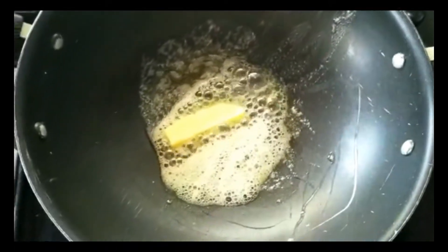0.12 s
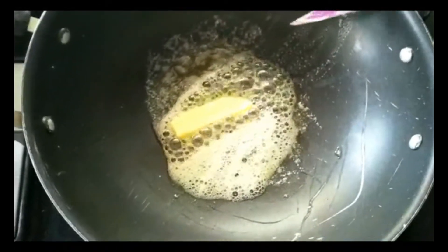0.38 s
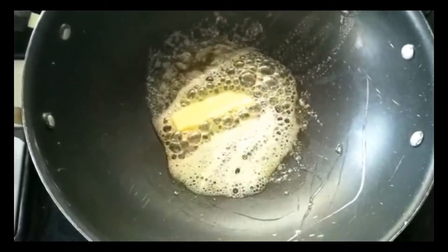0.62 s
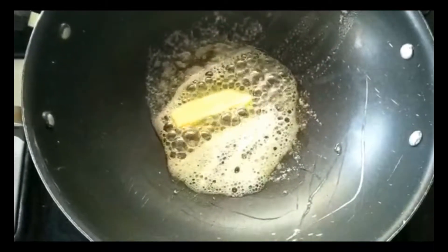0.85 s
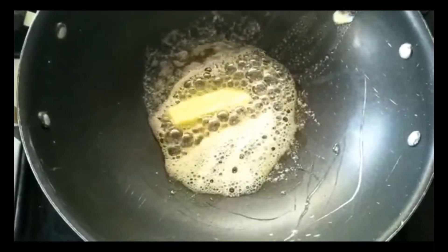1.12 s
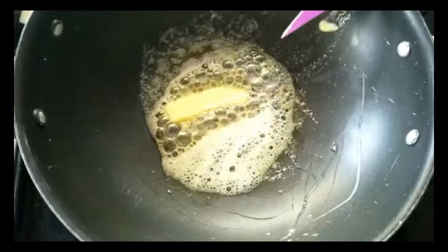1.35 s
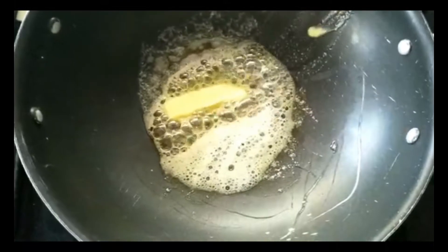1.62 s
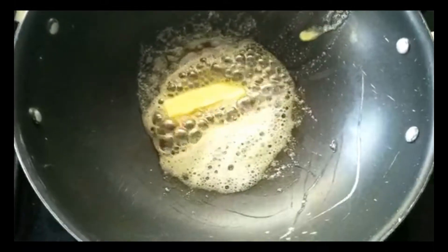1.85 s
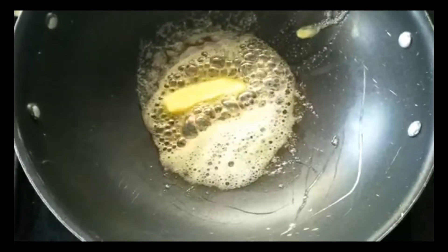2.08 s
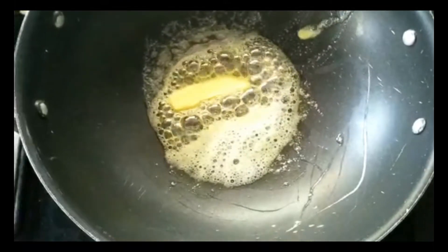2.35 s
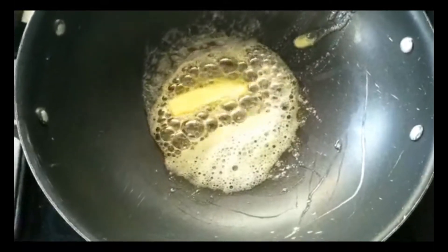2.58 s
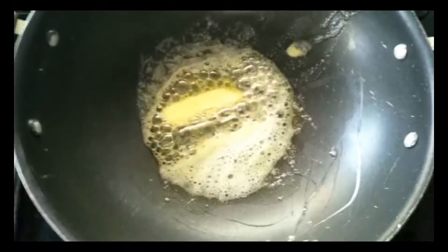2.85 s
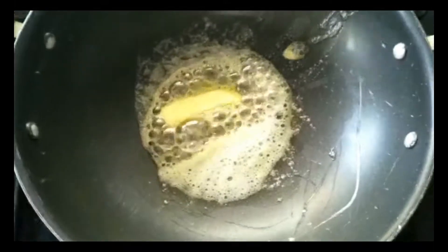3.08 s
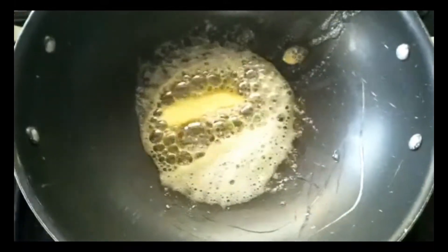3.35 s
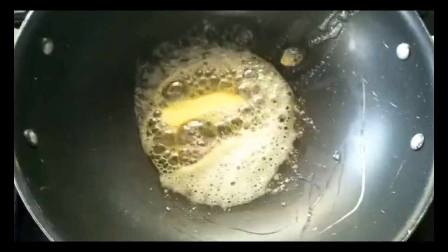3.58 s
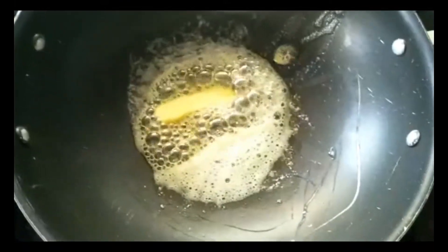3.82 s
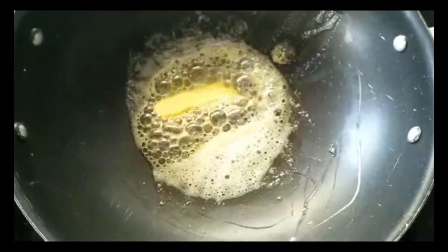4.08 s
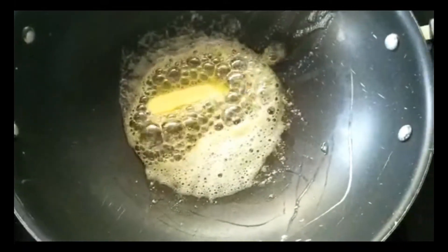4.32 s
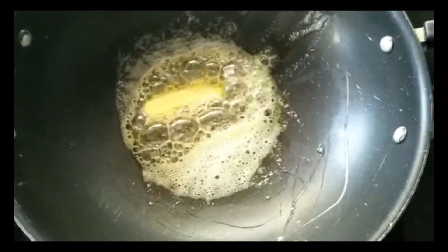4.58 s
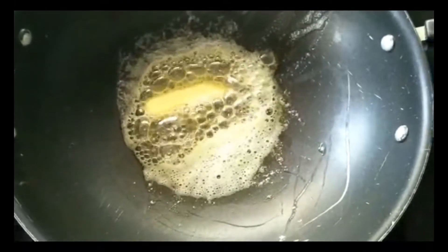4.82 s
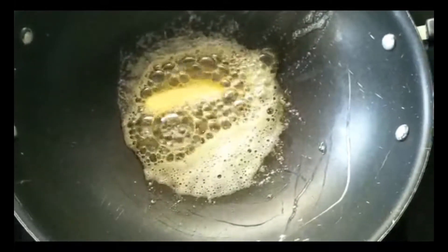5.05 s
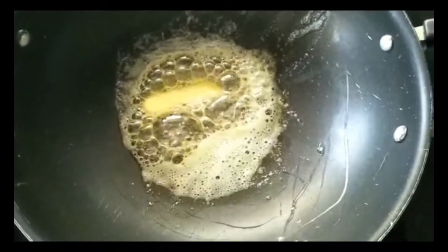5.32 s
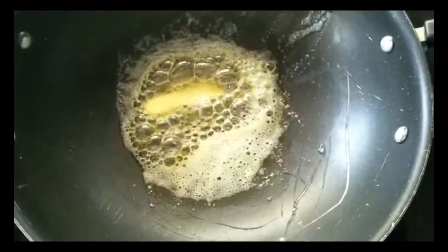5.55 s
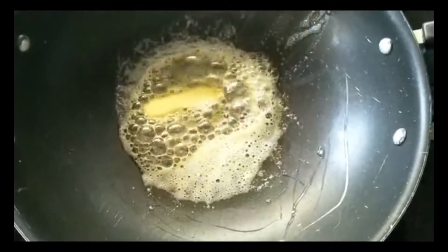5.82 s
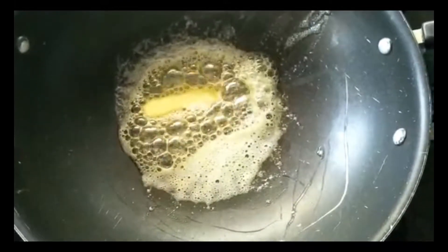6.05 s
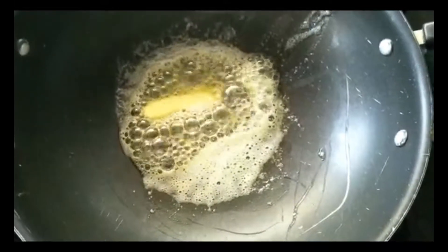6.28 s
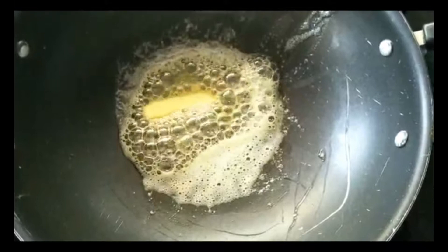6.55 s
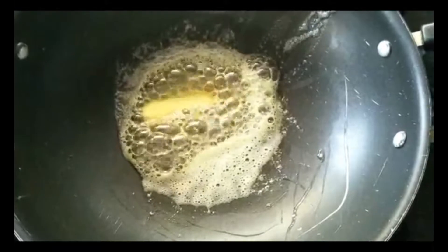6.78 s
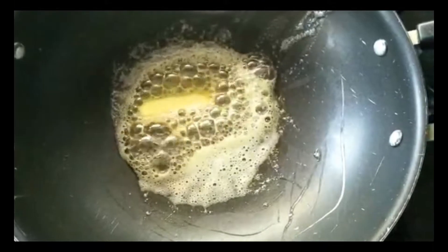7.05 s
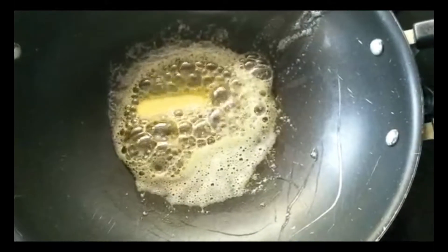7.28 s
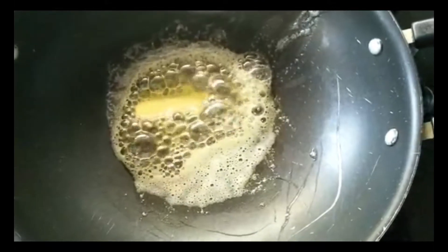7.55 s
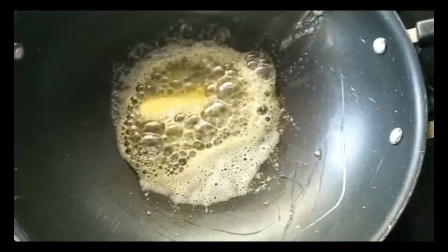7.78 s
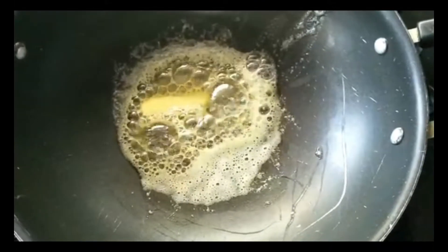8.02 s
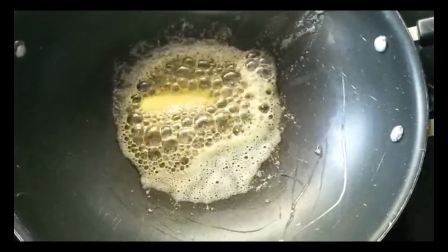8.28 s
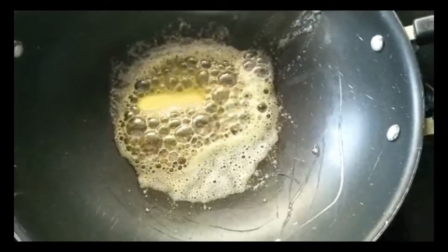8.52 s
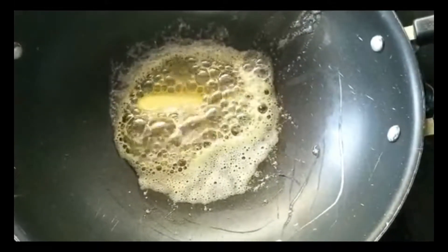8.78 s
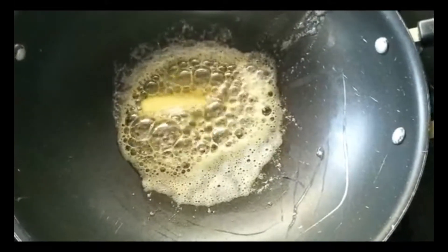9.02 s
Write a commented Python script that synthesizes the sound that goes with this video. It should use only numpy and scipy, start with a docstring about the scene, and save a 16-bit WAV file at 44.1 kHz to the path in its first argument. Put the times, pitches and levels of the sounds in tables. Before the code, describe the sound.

Butter melts in a hot steel pan, heard from close above: a steady bright hiss full of tiny crackles, with irregular sharp pops snapping many times a second. A faint knife tap comes almost at once, then one hard metallic click just after a second. The sizzle goes on, slightly stronger later. Dull knocks sound faintly across the kitchen around six seconds, over a low fan hum.

```python
"""Butter melts in a hot steel pan: its water boils off in countless small bubbles that burst with a snap and
a short ring and echo off the bowl of the pan; the finest foam merges into flickering hiss.
A knife taps the pan wall and strikes its modes; farther off in the kitchen something is knocked, heard as
dying noise in furniture modes. Near the end a short blip glides up; a fan hums low in the room air.
Two spaced microphones hang close above the pan."""
import sys
import numpy as np
from scipy import signal
from scipy.fft import rfft, irfft, next_fast_len
from scipy.io import wavfile
from scipy.ndimage import uniform_filter1d

SR = 44100
rng = np.random.default_rng(int(sys.argv[2]) if len(sys.argv) > 2 else 0)


def dump_mix(stems):
    """Bounce the given channels to the path in sys.argv[1] as a 16-bit WAV at rate SR."""
    frames = np.atleast_2d(stems).T  # one column per channel
    limited = np.clip(frames, -1, 1)  # hard clip at full scale
    pcm = np.round(limited * 32767).astype(np.int16)
    wavfile.write(sys.argv[1], SR, pcm)


def gain_from_decibels(decibels):
    """Convert decibel values to linear amplitude factors."""
    exponent = np.asarray(decibels, float) / 20
    return 10 ** exponent


N = 403074   # length in samples

# course of the boil between the large bursts: t/s, sizzle level/dB, treble level/dB, low-edge level/dB
BOIL_COURSE = [(0.0, -53.5, -59.5, -51.5), (0.76, -56, -60.5, -55.5), (1.14, -53.5, -60.5, -52.5),
               (1.55, -54.5, -65, -55), (1.96, -54.5, -59, -54), (2.62, -52.5, -64.5, -55),
               (3.44, -54.5, -63.5, -54), (3.82, -54, -65, -56), (4.27, -53, -64.5, -55),
               (6.11, -52.5, -64, -55.5), (6.49, -50.5, -65, -53), (7.18, -50, -64.5, -52.5),
               (7.48, -47, -67, -58.5), (7.94, -51.5, -63.5, -55.5), (8.94, -52, -65, -54),
               (9.14, -48, -64.5, -53)]
SURGE_DB, SURGE_CORNER_HZ = 0.6, 10   # chance surges of the sizzle: spread, corner of their low-pass
# loudest bubbles bursting: t/s, ring level/dB, ring f/Hz, ring length/cycles, snap level above 9 kHz/dB,
# left over right/dB
LARGE_BURSTS = [(0.0352, -34.5, 3830.0, 0.52, -55.0, 6), (0.0488, -31, 4740, 0.83, -40, 1),
                (0.1668, -35, 5160.0, 1.9, -58, 5.0), (0.3087, -28, 4600, 1, -36.0, 10),
                (0.3367, -23, 5960, 1.6, -36, 1), (0.41, -22.5, 4130, 0.75, -27.0, 5.5),
                (0.4973, -44, 3540.0, 0.8, -34, 3.0), (0.5561, -42, 5510.0, 1.8, -31, 1.0),
                (0.5692, -32, 5930.0, 5.0, -40.0, 3.0), (0.6384, -31.0, 5350, 1.9, -54.0, 8),
                (0.6924, -32.5, 3760, 0.9, -37, 8), (0.755, -39.5, 3590.0, 0.58, -42, 6.0),
                (0.8405, -38, 5100, 2.1, -30.5, 4), (0.9156, -26.5, 5600, 1.6, -41, 11),
                (0.9449, -24.5, 5870, 1.1, -59.0, 8), (0.9938, -34, 6310.0, 1.8, -50.0, 14),
                (1.0936, -35, 5010.0, 1.5, -53.0, 16.0), (1.1398, -28.5, 5800, 1, -50.0, 9.0),
                (1.1834, -27.0, 4900, 1.1, -52, 6.0), (1.2311, -39, 5170.0, 1.4, -35, 3.0),
                (1.2577, -26.5, 6140.0, 0.98, -37, 6), (1.2736, -38, 5410.0, 1.2, -39, 3),
                (1.6007, -33, 4300, 2, -62.0, 9), (1.6761, -29, 5650, 1.5, -29.5, 1),
                (1.6887, -27.0, 5600, 0.83, -45, -1), (1.772, -19.5, 6360, 1.9, -39, 12.5),
                (1.8017, -33, 6100, 1.1, -32, 2), (1.8442, -37, 5170, 2, -39, 14),
                (1.8708, -47, 3750.0, 2.2, -35.0, -16), (1.9215, -32.5, 5800, 3.2, -48, 12.0),
                (1.9281, -33, 5550.0, 1.7, -59.0, -7), (2.0054, -24.0, 4560.0, 0.83, -42, 1),
                (2.0642, -43, 6400.0, 3.6, -32, 3), (2.1075, -43.0, 4570.0, 1.2, -32.5, 9),
                (2.1675, -22, 5660, 1.8, -50, 7), (2.2598, -28, 5600, 0.94, -60.0, 6),
                (2.2823, -32, 4590.0, 0.85, -31.5, 6), (2.4697, -33, 5860, 0.81, -59.0, 11),
                (2.4918, -32, 5960, 0.99, -41, 10), (2.5236, -29.5, 6060, 1.7, -56.0, 13),
                (2.5363, -42, 5190.0, 1.3, -42.0, 8), (2.7573, -52, 4350.0, 2.2, -64.0, 6),
                (2.8048, -36, 4120, 3.4, -60.0, 3), (2.8348, -52.0, 4350.0, 4.9, -49, 2),
                (2.947, -32, 6090.0, 0.83, -53, 12.0), (2.9944, -48, 4590.0, 1.3, -43, 4),
                (3.1386, -36, 4620.0, 1.9, -62.0, 6), (3.199, -34, 5770, 1.3, -30, 2),
                (3.2598, -45, 4720.0, 1.2, -29.5, 2), (3.3351, -33, 4370.0, 1.7, -60.0, 5.0),
                (3.3815, -27.5, 4430, 1.3, -51, 3.0), (3.5367, -27.5, 5850, 1.2, -50, -7),
                (3.8015, -32, 5360, 4, -62.0, 9), (3.8113, -25.5, 5230, 1.4, -62.0, 2),
                (3.8635, -27.5, 5030.0, 1.9, -62.0, 0), (3.91, -30, 5380.0, 2.2, -63.0, 1),
                (3.9892, -31.5, 5560, 1.6, -63.0, -11), (4.0742, -36, 4750, 1.1, -62.0, 0),
                (4.1039, -29.5, 5240.0, 1.2, -61.0, -3), (4.2077, -37.5, 4470.0, 2.3, -54.0, 13.0),
                (4.2199, -30, 4790.0, 2.5, -62.0, 4.0), (4.2762, -29, 6120.0, 1.4, -62.0, 7),
                (4.292, -35, 5440.0, 2.4, -60, 9.0), (4.402, -32.0, 5770.0, 2, -38, 3),
                (4.448, -37, 4870.0, 0.91, -39, 4), (4.4897, -55, 4450.0, 1.4, -40.0, -2),
                (4.4987, -60, 4190.0, 5.0, -40.0, 1), (4.5628, -33, 4800, 0.98, -43, 1.0),
                (4.571, -46, 4260.0, 2.7, -46, 3), (4.6083, -23, 6700, 2.4, -54, 5),
                (4.7467, -28, 6400, 3.6, -60.0, 4.0), (4.7621, -32, 4400.0, 5.0, -60.0, 2),
                (4.7793, -49.0, 4530.0, 3.4, -35, 2), (4.8107, -27.0, 5630, 3.1, -60.0, 0),
                (4.8196, -31, 5400, 1.7, -48.0, 1), (4.8273, -22, 6600, 3.2, -44.0, 6),
                (4.8545, -26.5, 6000, 1.5, -51.0, 12.0), (4.8933, -32, 6040, 2.0, -53, -5),
                (4.9695, -21.5, 5950, 1.14, -41.0, 4), (4.9917, -31, 5210.0, 0.83, -59.0, -1),
                (5.0263, -46, 6420.0, 1, -34, 1.0), (5.1442, -41, 6950.0, 2, -31.5, 4),
                (5.1687, -26, 5700, 1.3, -60.0, 2), (5.1953, -30, 5040, 1.6, -61.0, 1),
                (5.2263, -21, 4270, 1.7, -58.0, 4), (5.2912, -30.5, 3600, 2.5, -52.0, 2),
                (5.4075, -26.5, 5050, 2, -58.0, 7), (5.4602, -29.5, 5310.0, 1.2, -60, 8),
                (5.4834, -34, 5420.0, 1.3, -57, 5.0), (5.528, -29, 6000, 1.2, -64.0, 9),
                (5.6789, -16.5, 5650, 1.17, -49, 2), (5.6864, -34, 5100.0, 4.1, -60.0, -3.0),
                (5.7095, -23.5, 5600, 1.5, -58, 10), (5.7855, -45, 6090.0, 5.0, -31, 4),
                (5.8265, -35, 6260.0, 5.0, -60.0, 3.0), (5.8875, -32.5, 5540.0, 3.9, -62.0, -4),
                (6.0368, -27.5, 5500, 2, -53, 0), (6.1211, -29.5, 5500, 1.3, -62.0, -5),
                (6.1484, -25.5, 5830, 2, -60.0, 6), (6.1765, -30.0, 5740.0, 2.2, -37, 1.0),
                (6.1824, -23, 5800, 0.95, -61.0, 2.0), (6.1885, -23, 5240, 2.1, -51.0, 3),
                (6.2533, -38.0, 5380.0, 2.7, -36, 2), (6.2927, -32.5, 3400, 2.2, -62.0, 2),
                (6.3424, -30, 6430.0, 1.9, -51.0, 8), (6.4101, -29, 7050.0, 1.4, -39, 5),
                (6.4304, -26.0, 4450, 2.2, -56.0, 8), (6.4549, -46, 5070.0, 1, -39, 6.0),
                (6.4855, -39, 3920.0, 0.8, -40, 6), (6.5872, -30, 5430, 1.1, -62, 4),
                (6.6078, -34, 5330.0, 3.6, -30.5, 6), (6.6363, -24.5, 5300, 1.7, -62.0, -1),
                (6.6911, -21.5, 4640.0, 1.5, -63.0, 9.5), (6.7002, -31, 4000, 1.8, -59, -16),
                (6.7121, -46, 4530, 3.2, -38, 5), (6.8197, -51, 4790.0, 3.4, -42.0, 12),
                (6.8564, -23.5, 5300, 3.7, -58, 0), (6.8841, -29.0, 5980.0, 2, -35, 5),
                (7.0637, -51, 5640.0, 3.1, -32, 2), (7.1241, -30, 5730.0, 3, -62.0, 11),
                (7.1843, -33, 7540, 3.1, -37, 7), (7.2533, -32, 4970, 2.3, -35, 7),
                (7.3511, -33.5, 5150.0, 2.7, -62.0, 12), (7.3604, -29, 5550.0, 2.4, -65, 11),
                (7.4174, -31, 5530, 3.8, -62.0, 8), (7.5638, -29, 6060, 2, -48, 15),
                (7.6205, -52, 5410.0, 0.8, -45, 4), (7.68, -24, 4870, 1.1, -64.0, 2),
                (7.7984, -27, 6140.0, 2.8, -62.0, 3.0), (7.8104, -23.5, 5700, 1.1, -44, 13),
                (7.941, -30.5, 5270, 4.7, -62.0, 3), (7.9677, -56, 4480.0, 1.7, -36, 4),
                (7.9936, -33, 5800, 1.7, -35, 6), (8.1093, -32, 4400, 2.1, -60, 9),
                (8.1461, -33, 7350, 4.0, -62.0, 8.0), (8.2797, -23, 5500.0, 1.3, -62.0, -2),
                (8.3278, -26, 4840, 1.6, -42, 5), (8.3981, -25.5, 5400, 1.2, -62.0, 3),
                (8.5382, -30, 6400.0, 5.4, -61.0, 0.0), (8.5693, -24.5, 5700, 1.9, -57, 11),
                (8.5772, -31.0, 4370, 1.9, -63.0, 5.0), (8.5946, -34, 4850, 4.1, -62, 9.0),
                (8.6573, -23, 5400.0, 1.5, -53.0, 4), (8.6633, -31, 5260.0, 2.7, -61.0, 7),
                (8.6723, -56, 5030, 1.1, -37, -5), (8.7261, -31, 5910.0, 1.8, -62.0, 9),
                (8.7423, -27, 5340, 1.1, -63.0, -1), (8.8459, -22, 5600, 0.98, -43, 5),
                (9.0255, -24, 4630.0, 1.2, -52.0, 0), (9.0573, -29, 4230, 3.2, -62.0, 0)]
# chance of the middling bursts, rows (mean, spread): ring level over the sizzle/dB, ring f/Hz,
# ring length/cycles, snap level over the treble of the sizzle/dB, left over right/dB
MIDDLING_CHANCE = [(11, 6.3), (5400, 820), (2.24, 1.4), (12, 4.9), (5.1, 12)]
# colour of the sizzle as pan and microphones pass it: f/Hz, gain/dB
SIZZLE_COLOUR = [(820, -53), (1400, -40), (1650, -21.5), (2240, -12.5), (2640, 1.5), (3220, 2), (5470, 4.5),
                 (6010, 4), (6810, 4), (9500, -10), (12300, -12), (15200, -4.5), (16000, -56), (16800, -58)]
POP_ECHO_DB, POP_ECHO_SPREAD_DB = -8.5, 1.5   # echoes of a one-cycle burst against its ring
ECHO_SIDE_SHARE = 0.42   # share of a burst's left-right difference in dB that its echoes keep
POP_BODY_DB, BODY_PITCH_SHARE = -17.5, 0.57   # a burst also gives one dull cycle at this share of its pitch
BOWL_HZ, BOWL_WIDTH_HZ, BOWL_DB = 2740, 200, 5.5   # the air in the pan's bowl rings after a burst
LEAD = 120   # samples that a ring may swell before its peak

# knife on the pan wall: t/s, level/dB, centre f/Hz, fall-off/(dB/octave), crack level/dB,
# share of the full ring time
KNIFE_TAPS = [(0.4101, -27, 2700, 45, -50, 0.72), (0.4364, -29, 6600, 16, -45, .08),
              (0.4421, -22.5, 1260, 8, -47, 0.46), (0.4439, -28.5, 6600, 24, -33, 1.14),
              (1.3565, -21, 1000, 5.5, -45, 0.9), (1.357, -23.5, 5460, 9, -20, 1.1),
              (1.3587, -14, 6900, 9, -23, 0.35), (1.36, -27, 5050, 1.5, -29, 0.91),
              (1.3717, -27, 7000, 12, -35, 1.2), (1.3814, -15.5, 4600, 18, -38, 0.29),
              (.458, -19.5, 100, 19, -70, 1), (1.376, -13, 99, 22, -70, 0.46)]
# modes of the pan: f/Hz, relative level/dB, full t60/s
PAN_MODES = [(86, -20.5, 0.25), (194, -22, 1.0), (483, -23, 0.66), (565, -19, 0.099), (660, -15, 0.066),
             (745, -13, 0.12), (750, -26, 0.69), (851, -36, 0.44), (1268, -12, 0.13), (1222, -36.5, 1.0),
             (1233, -40, 1.0), (1330, -32, 1.0), (1600, -24, .06), (1850, -15, 0.06), (1990, -14.5, 0.13),
             (2460, -29, 0.069), (2700, -12, 0.07), (2920, -4, 0.057), (4300, -12, 0.075),
             (4640, -5.5, 0.051), (5050, -1.5, 0.063), (5950, -2.5, 0.039), (6870, -3, 0.078),
             (7560, -3, 0.024)]
BEATING_FROM_HZ = 3700   # below this the pan modes lie apart and ring ever cleaner

# knocks across the room: t/s, level/dB, centre f/Hz, fall-off/(dB/octave), rise/s, full t60/s
FAR_KNOCKS = [(6.094, -42, 745, 37, 0.012, 0.47), (6.095, -51.5, 1260, 39, 0.012, 0.35),
              (6.386, -45, 930, 25, 0.0019, 0.3), (6.445, -54, 970, 28, 0.0028, 0.45),
              (6.469, -43.5, 550, 39, 0.008, 0.4), (6.47, -51.5, 1150, 16, 0.0066, 0.55)]
# modes of the knocked furniture: f/Hz, width of each filter pass/Hz, relative level/dB, share of the t60
FURNITURE_MODES = [(476, 54, 3.5, 1.5), (557, 45, -2, 1.1), (654, 30, 3, 0.25), (755, 35, -4.5, 1.14),
                   (860, 130, -3.5, 1.34), (1000, 71, -3.5, 1.14), (1086, 65, -6, 1.5),
                   (1306, 76, 0.5, 0.81), (1730, 1800, 14, 0.72)]
# low blip sweeping up: t/s, f/Hz, rms level/dB
RISING_BLIP = [(9.115, 117.6, -56), (9.124, 256, -58), (9.130, 560, -47), (9.134, 670, -40),
               (9.14, 887, -58)]

# colour of the room air: f/Hz, relative level/dB
AIR_COLOUR = [(15, -38), (25, -15.5), (69, -1.5), (115, -5), (147, -7.5), (182, -10), (267, -6),
              (393, -12.5), (674, -14), (1050, -12.5), (1640, -16), (2270, -14.5), (2500, -23),
              (3250, -0.5), (5500, -120)]
AIR_DB = -58.5   # rms level
# hum of the fan: f/Hz, width of each filter pass/Hz, rms level/dB
FAN_HUM = [(90.2, 18.5, -71), (132.65, 4.4, -68.5), (271.6, 25, -72.5)]
STEADINESS = 0.59   # narrow rings and hums waver less than noise does: 0 noise, 1 even level
KITCHEN_T60_S, KITCHEN_DB = 0.45, -14.5   # reverberation: decay time, level against the near sound

# likeness of diffuse sound in the two microphones: f/Hz, correlation
MICROPHONE_LIKENESS = [(60, 0.9995), (140, 0.999), (280, .985), (550, 0.85), (1100, .75), (2000, 0.5),
                       (4970, 0.3), (15000, 0.15)]
RIGHT_LAG_S, AIR_LAG_S = 0.00022, 0.00017   # right microphone behind the left: bursts, diffuse sound


def pops():
    """Each burst of some size rings at its pitch and side, and stirs the air in the bowl."""
    out = np.zeros((2, N + 2000))
    for s, peak_db, hz, cycles, treble_db, pan_db in sorted(LARGE_BURSTS) + middling_pops():
        # a single tick puts 14 kHz / SR of its height into the band above 9 kHz
        snap_db = treble_db - peak_db + 20 * np.log10(SR / 14000)
        echo_db = POP_ECHO_DB + POP_ECHO_SPREAD_DB * rng.standard_normal()
        echo_db -= 5.0 * np.log10(cycles)   # long rings overlap in their echoes
        shape = burst(hz, snap_db, echo_db, cycles, dying_s=0.01, body_db=POP_BODY_DB) * gain_from_decibels(peak_db)
        sided = np.where(np.arange(shape.shape[1]) < LEAD + 40, 1, ECHO_SIDE_SHARE)
        at = round(s * SR) - LEAD
        out[:, at:at + shape.shape[1]] += shape * gain_from_decibels(pan_db / 2 * sided * [[1], [-1]])
    bursts = out[:, :N]
    bowl = gain_from_decibels(BOWL_DB) * resonance(bursts, BOWL_HZ, BOWL_WIDTH_HZ)
    return signal.sosfilt(signal.butter(3, [500, 16000], "band", fs=SR, output="sos"), bursts + bowl)


def middling_pops():
    """Middling bubbles burst at random, 12 a second, with levels that follow the boil."""
    s, sizzle_db, treble_db, _ = np.transpose(BOIL_COURSE)
    mean, spread = np.transpose(MIDDLING_CHANCE)
    when = rng.uniform(0.01, N / SR, size=110)
    luck = np.clip(rng.standard_normal((len(when), 5)), -2, 2)
    over_db, hz, cycles, snap_db, pan_db = (mean + spread * luck).T
    peak_db = np.interp(when, s, sizzle_db) + over_db
    snap_db = np.interp(when, s, treble_db) + snap_db
    return list(zip(when, peak_db, hz, np.maximum(cycles, 0.8), snap_db, pan_db))


def burst(hz, snap_db, echo_db, cycles, dying_s, body_db):
    """One bubble snaps and rings a few cycles, then echoes off bowl and stove, other echoes each side."""
    luck = rng.random((2, 3, 60))
    direct_s = np.array([[0], [RIGHT_LAG_S]]) + 0.00004 * luck[:, 2, :1]
    lags = direct_s + np.arange(60) ** 1.3 * 0.00007 * (0.5 + luck[:, 0])
    lags[:, 1:] += 0.0008   # way to the nearest wall of the bowl and back
    heights = gain_from_decibels(echo_db) * np.exp(-lags / dying_s) * (2 * luck[:, 1] - 1)
    heights[:, 0] = 1   # the direct sound
    paths = np.zeros((2, 1600))
    np.add.at(paths, (np.arange(2)[:, None], np.minimum(lags * SR, 1599).astype(int)), heights)

    u = np.arange(-LEAD, 2 * LEAD) / SR * hz / cycles   # time in ring lengths
    envelope = np.exp(-np.where(u < 0, 2.5, 1.5) * u ** 2)   # swells fast and dies more slowly
    ring = np.sin(2 * np.pi * cycles * u + 1.26) * envelope
    v = u * cycles * BODY_PITCH_SHARE
    body = gain_from_decibels(body_db) * np.sin(2 * np.pi * v + 0.89) * np.exp(-2.0 * v ** 2)
    sound = signal.fftconvolve(paths, (ring + body)[None], axes=1)

    tick = gain_from_decibels(snap_db) * signal.lfilter([0.85, -0.2], [1], paths)   # the film tears: one bright tick
    weaker_echoes = 1.1 + 0.15 * np.exp(-np.arange(1600) / 30)
    sound[:, LEAD:LEAD + paths.shape[1]] += tick * weaker_echoes
    return sound


def crackle(sizzle_db, finest_db, coarsest_db):
    """Small bubbles burst in random clumps over nearly three octaves, each pitch at a spot of its own."""
    born = rng.random(N) < 3500 * gain_from_decibels(1.5 * drift(25)) / SR   # about 3500 a second
    sizes = gain_from_decibels(5.5 * np.minimum(rng.exponential(1, N), 3.0))
    sizes = born * sizes * rng.choice([-1, 1], N)
    pitches, dealt = np.geomspace(2200, 15000, 22), rng.integers(0, 22, N)
    size, total = next_fast_len(N + 2048), 0
    for k, hz in enumerate(pitches):
        fine = np.clip(np.log2(hz / 7000) * 2, 0, 1)
        gain = gain_from_decibels(sizzle_db + fine * finest_db + (hz < 3800) * coarsest_db + 2.0 * drift(25.0))
        shape = burst(hz, snap_db=-4.5, echo_db=6.0, cycles=2.14, dying_s=0.0037, body_db=-17.5)
        strikes = sizes * (dealt == k) * gain
        total = total + rfft(strikes, size) * rfft(rms_one(shape) * np.sqrt(hz), size)
    return irfft(total, size)[:, LEAD:N + LEAD] * gain_from_decibels(-64.0)


def foam(sizzle_db, finest_db, coarsest_db):
    """The finest foam merges into hiss that follows the boil; each size of bubble flickers on its own."""
    noise = stereo_noise()
    low, middle, high = [signal.sosfilt(signal.butter(3, edges, "band", fs=SR, output="sos"), noise)
                         for edges in ([2200, 3800], [3800, 8500], [8500, 18000])]
    low = low * gain_from_decibels(coarsest_db + 1.5 * drift(17))
    middle = middle * gain_from_decibels(1.5 * drift(21))
    high = high * gain_from_decibels(finest_db + 2.2 * drift(13))
    return gain_from_decibels(sizzle_db - 2.5) * (low + middle + high)


def taps():
    """Each touch of the knife is a rough crack that strikes all pan modes; phases differ per microphone."""
    out, t = np.zeros((2, N)), np.arange(SR // 2) / SR
    edge = signal.butter(3, [1700, 8200], "band", fs=SR, output="sos")
    swell = 1 - np.exp(-t / 0.00014)
    for s, peak_db, centre_hz, fall_db, crack_db, share in KNIFE_TAPS:
        phases, at = rng.normal(0, 1, (len(PAN_MODES), 2, 1)), round(s * SR)
        grit = rng.standard_normal((2, len(t)))
        crack = signal.sosfilt(edge, grit) + 0.079 * grit
        out[:, at:at + len(t)] += swell * gain_from_decibels(crack_db - 60 * t / (0.051 * share)) * crack
        for (hz, level_db, t60), phase in zip(PAN_MODES, phases):
            struck_db = peak_db + level_db - fall_db * abs(np.log2(hz / centre_hz))
            decay = gain_from_decibels(struck_db - 60 * t / (t60 * share))
            # close modes beat unevenly
            shiver = uniform_filter1d(rng.standard_normal((2, len(t))), size=200)
            beating = 0.61 + 7.8 * min(hz / BEATING_FROM_HZ, 1) ** 2 * shiver
            wave = np.sin(2 * np.pi * hz * t + phase * min(hz / 2500, 3))
            out[:, at:at + len(t)] += swell * decay * beating * wave
    return out


def knocks():
    """Far blows arrive as reverberation: dying noise in the modes nearest each blow's centre."""
    out, noise, t = 0, stereo_noise(), np.arange(N) / SR
    rung = [gain_from_decibels(db) * narrow_noise(noise, hz, width) for hz, width, db, _ in FURNITURE_MODES]
    for s, level_db, centre_hz, fall_db, rise, t60 in FAR_KNOCKS:
        since = np.maximum(t - s, 0)
        swell = 1 - np.exp(-since / rise)
        for mode, (hz, _, _, share) in zip(rung, FURNITURE_MODES):
            struck_db = level_db - fall_db * abs(np.log2(hz / centre_hz))
            out = out + mode * swell * gain_from_decibels(struck_db - 60 * since / (t60 * share))
    return out


def blip():
    """A short sine glides upward, its phase summed from the moving pitch."""
    s, hz, db = np.transpose(RISING_BLIP)
    t = np.arange(N) / SR
    phase = 2 * np.pi * np.cumsum(np.interp(t, s, hz)) / SR
    return np.sqrt(2) * gain_from_decibels(np.interp(t, s, db, left=-120)) * np.sin(phase)


def kitchen(x):
    """Diffuse tail of decaying noise, without the deep bass and darker than the direct sound."""
    t = np.arange(SR // 2) / SR
    tail = rng.standard_normal((2, len(t))) * gain_from_decibels(-60 * t / KITCHEN_T60_S) * (t > 0.006)
    tail = signal.sosfilt(signal.butter(1, [400, 4000], "band", fs=SR, output="sos"), tail)
    return signal.fftconvolve(x, tail / np.sqrt(np.sum(tail ** 2) / 2), axes=1)[:, :N]


def air():
    """Steady room noise, and the wavering hum of a fan as narrow bands of noise."""
    noise = stereo_noise()
    hum = sum(gain_from_decibels(db) * narrow_noise(noise, hz, width) for hz, width, db in FAN_HUM)
    return gain_from_decibels(AIR_DB) * rms_one(coloured(stereo_noise(), AIR_COLOUR)) + hum


def stereo_noise():
    """White noise, alike at both microphones in the bass, unrelated in the treble, a little late on the right."""
    mid, side = rfft(rng.standard_normal((2, N)))
    hz = np.arange(len(mid)) * SR / N
    alike = np.clip(at_hz(MICROPHONE_LIKENESS, hz), -1, 1)
    late = np.exp(-2j * np.pi * hz * hz / (hz + 150) * [[0], [AIR_LAG_S]])   # less late in the deep bass
    both = np.sqrt(1 + alike) * mid + np.sqrt(1 - alike) * side * [[1], [-1]]
    return irfft(late * both, N) / np.sqrt(2)


def narrow_noise(noise, hz, width):
    """Noise through two equal resonances, its slow swells partly evened out; rms 1."""
    x = resonance(resonance(noise, hz, width), hz, width)
    level = uniform_filter1d(np.mean(x, axis=0) ** 2, size=1500)
    return rms_one(x / (level + 0.029 * level.mean()) ** (STEADINESS / 2))


def resonance(x, hz, width):
    """Two-pole band-pass, gain 1 on top."""
    r = np.exp(-np.pi * width / SR)
    poles = [1, -2 * r * np.cos(2 * np.pi * hz / SR), r * r]
    return signal.lfilter([(1 - r * r) / 2, 0, (r * r - 1) / 2], poles, x)


def drift(rate):
    """Slow chance: noise through a double one-pole low-pass with its corners at rate/Hz; spread 1."""
    r = np.exp(-40 * np.pi * rate / SR)   # drawn at every 20th sample
    slow = signal.lfilter([1], [1, -2 * r, r * r], rng.standard_normal(N // 20 + 2002))[2000:]
    return np.interp(np.arange(N) / 20, np.arange(len(slow)), rms_one(slow))


def coloured(x, spectrum):
    """Filter by a table of f/Hz, gain/dB."""
    size = next_fast_len(N + 4096)
    gain = gain_from_decibels(at_hz(spectrum, np.arange(size // 2 + 1) * SR / size))
    return irfft(rfft(x, size) * gain, size)[..., :N]


def at_hz(points, hz):
    """Read a table at any frequency, along a logarithmic axis."""
    table_hz, values = np.transpose(points)
    return np.interp(np.log(hz + 1), np.log(table_hz + 1), values)


def rms_one(x):
    """Scale to rms 1."""
    return x / np.sqrt(np.mean(x ** 2) + 1e-20)


def scene():
    """All sources at the two microphones."""
    s, *columns = np.transpose(BOIL_COURSE)
    sizzle_db, *bands_db = [np.interp(np.arange(N) / SR, s, c) for c in columns]
    # treble and low edge against the sizzle; the colour already holds their mean
    shares_db = [db - sizzle_db - np.mean(db - sizzle_db) for db in bands_db]
    sizzle_db = sizzle_db + SURGE_DB * drift(SURGE_CORNER_HZ)
    fine = crackle(sizzle_db, *shares_db) + foam(sizzle_db, *shares_db)
    near = coloured(fine, SIZZLE_COLOUR) + pops() + taps()
    return near + gain_from_decibels(KITCHEN_DB) * kitchen(near) + knocks() + blip() + air()


def low_pass(x):
    """Removes everything above the highest recorded frequency."""
    return signal.sosfilt(signal.butter(12, 16980, fs=SR, output="sos"), x)


def record(dry):
    """The finished mix of both microphones, as stored."""
    return low_pass(dry)


dry = scene()
out = record(dry)
dump_mix(out)
```